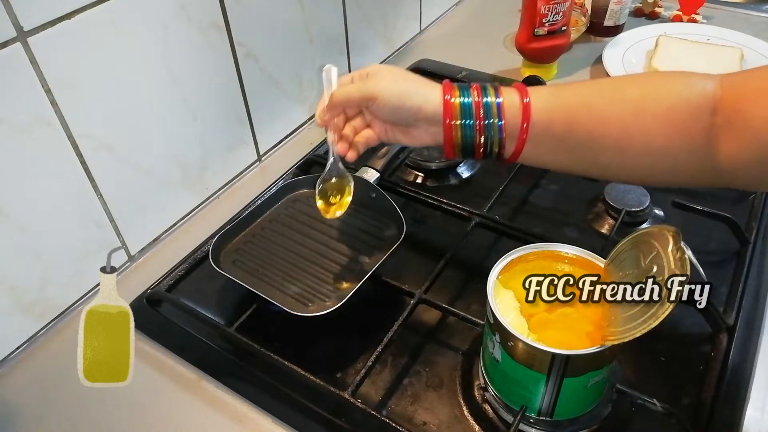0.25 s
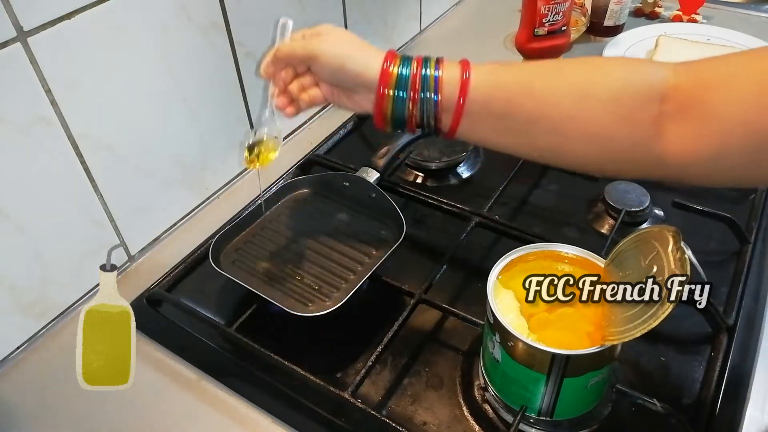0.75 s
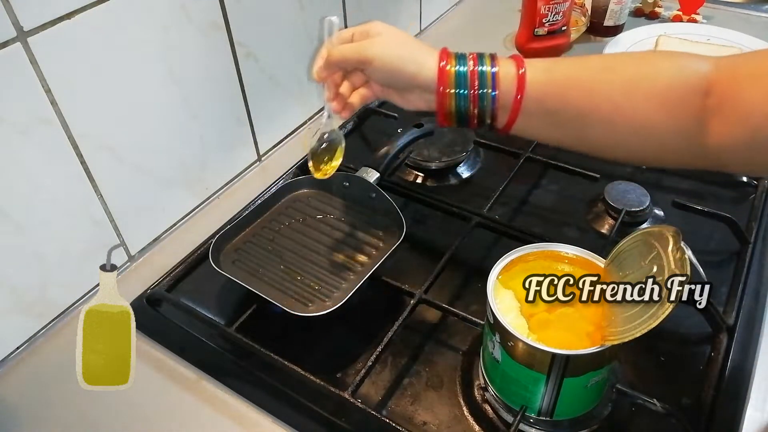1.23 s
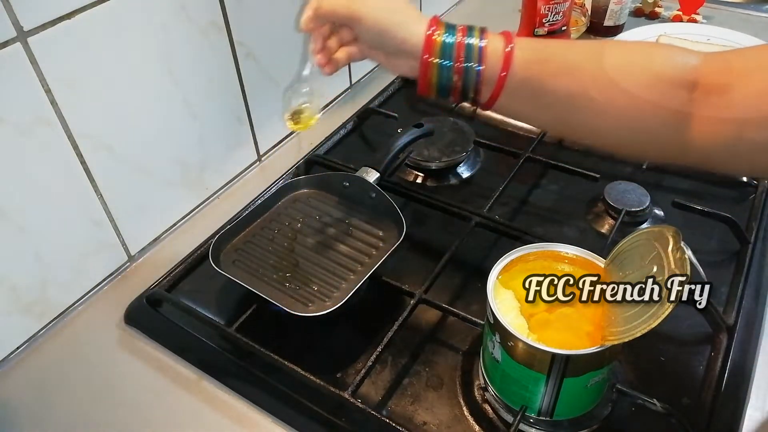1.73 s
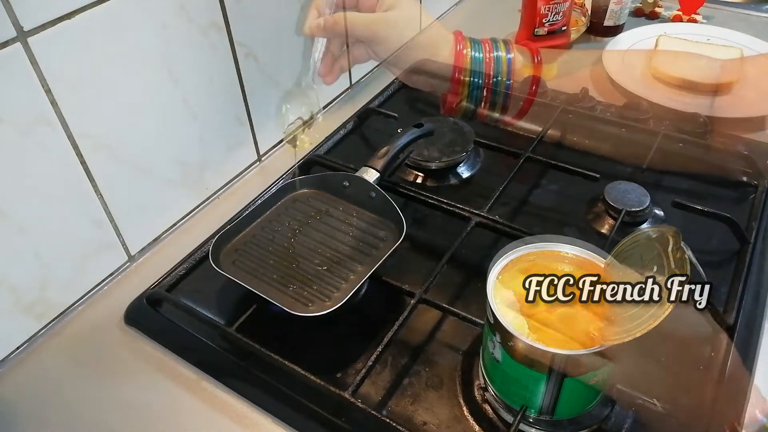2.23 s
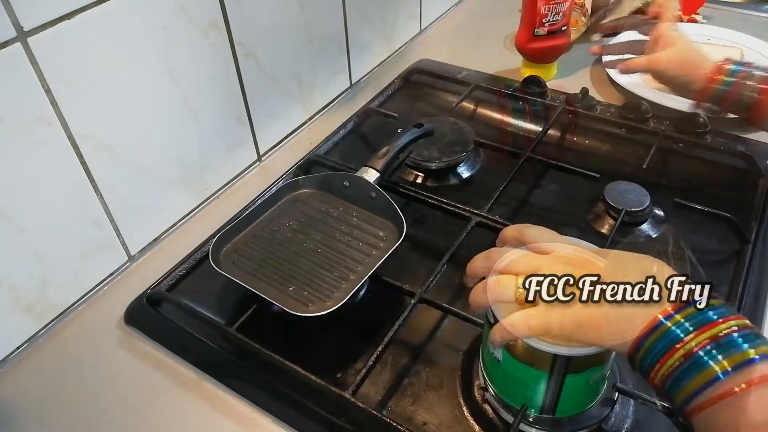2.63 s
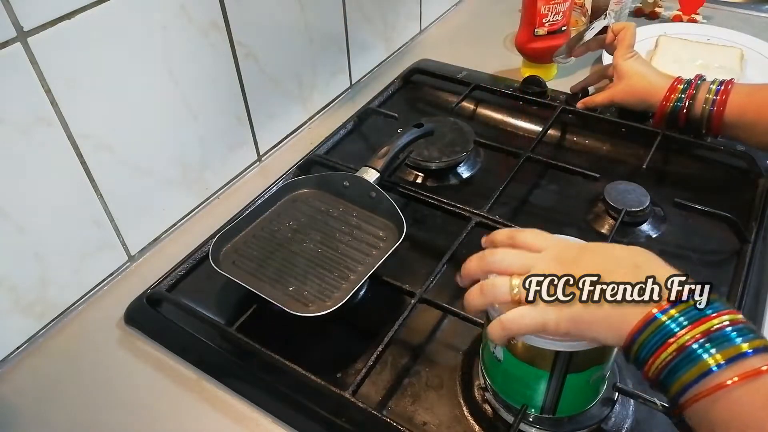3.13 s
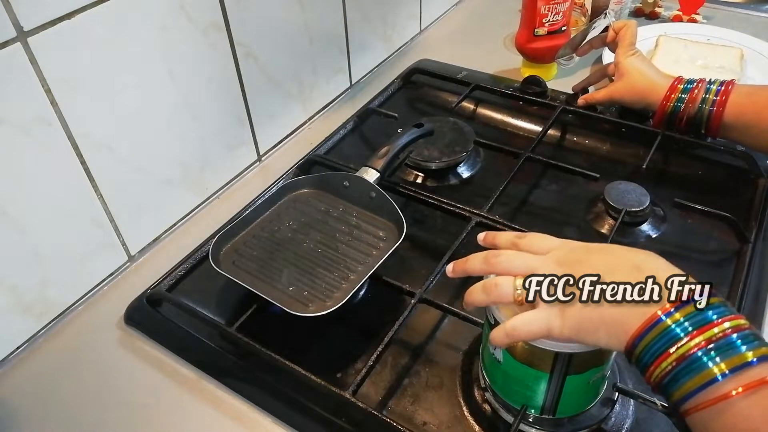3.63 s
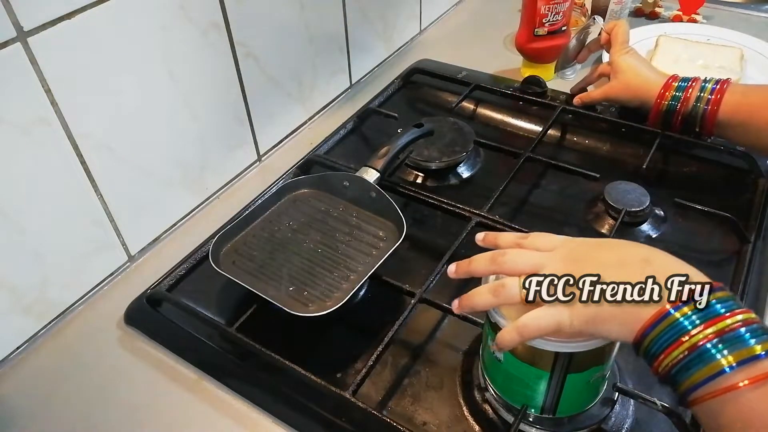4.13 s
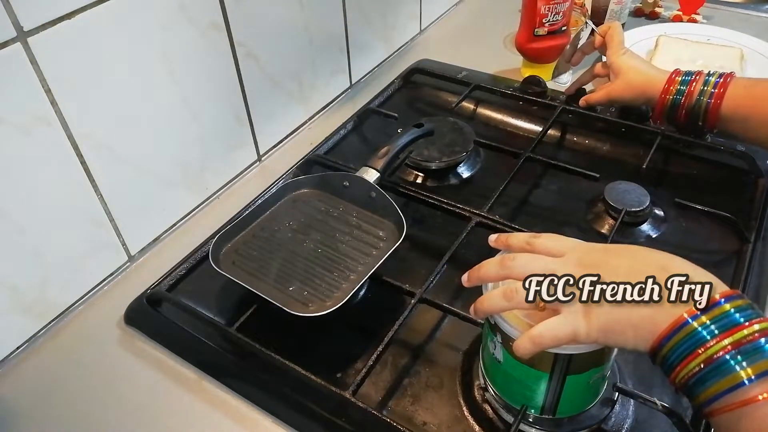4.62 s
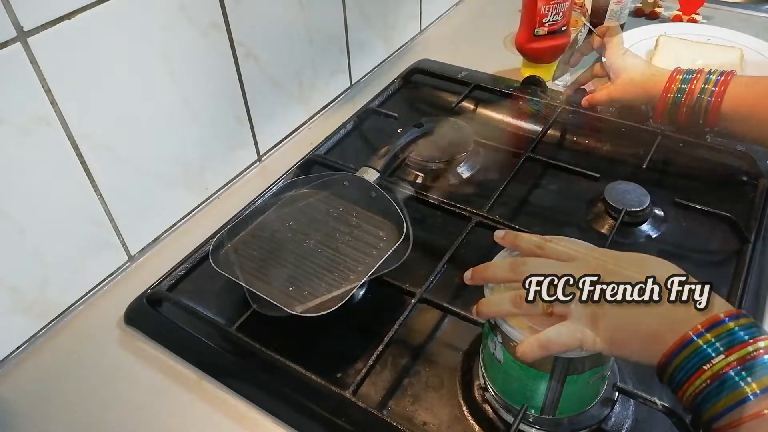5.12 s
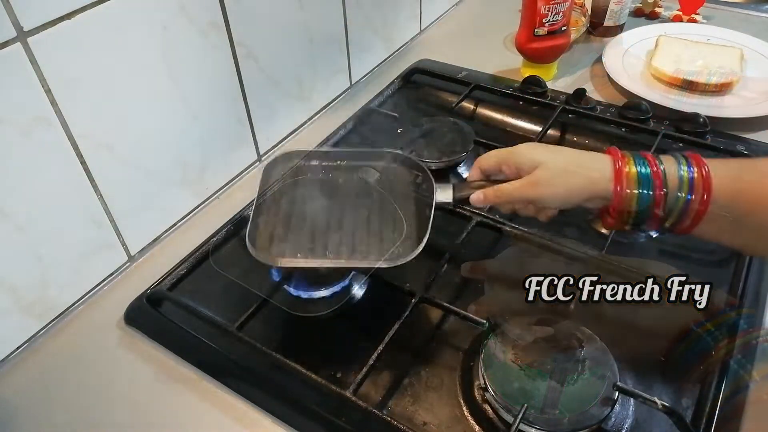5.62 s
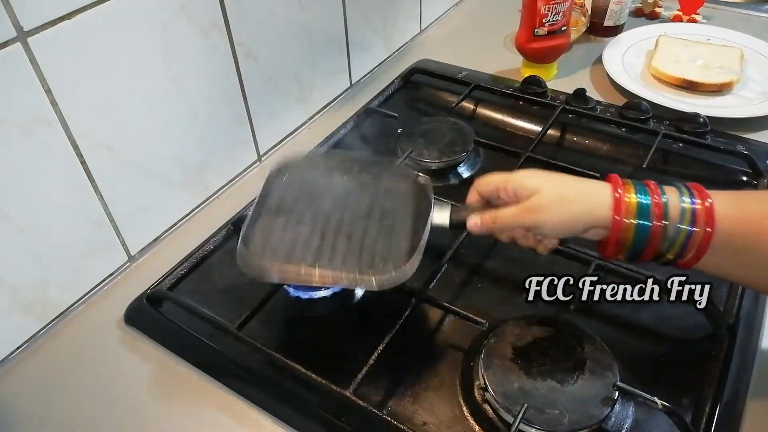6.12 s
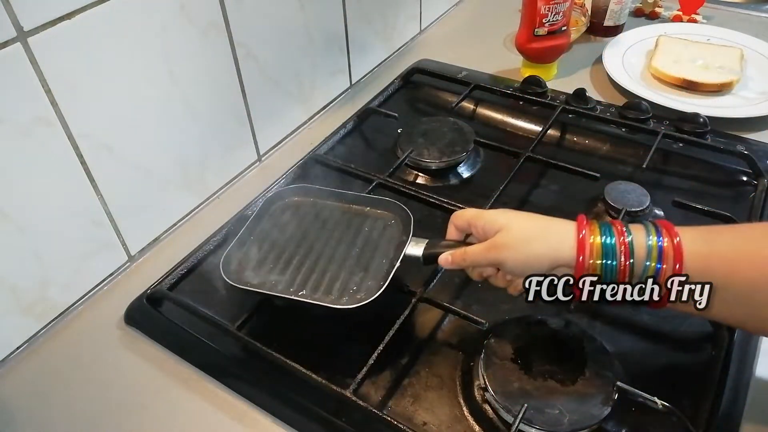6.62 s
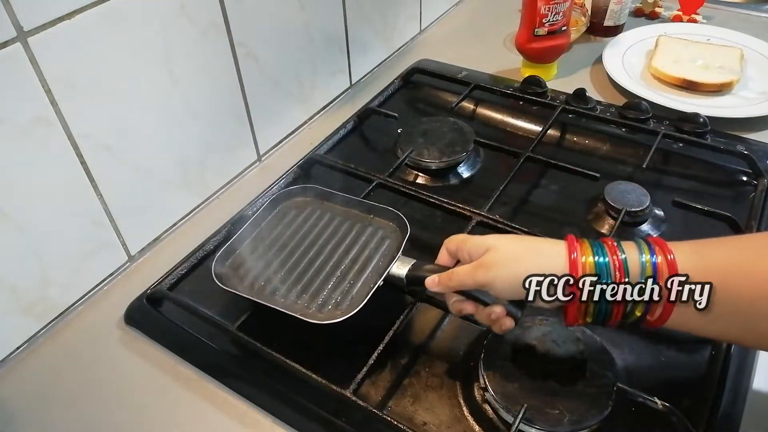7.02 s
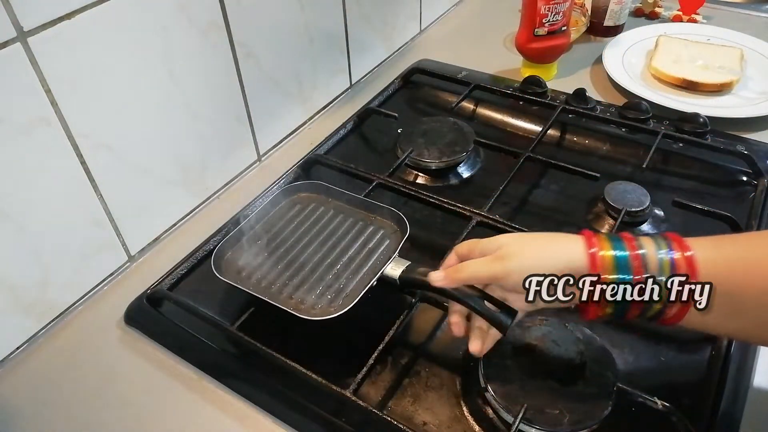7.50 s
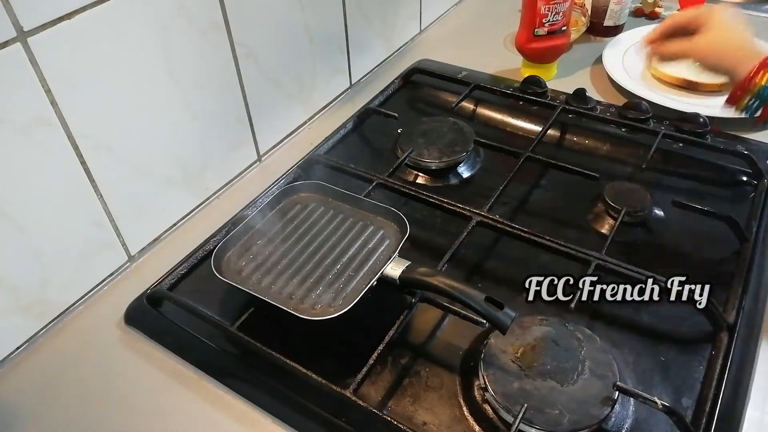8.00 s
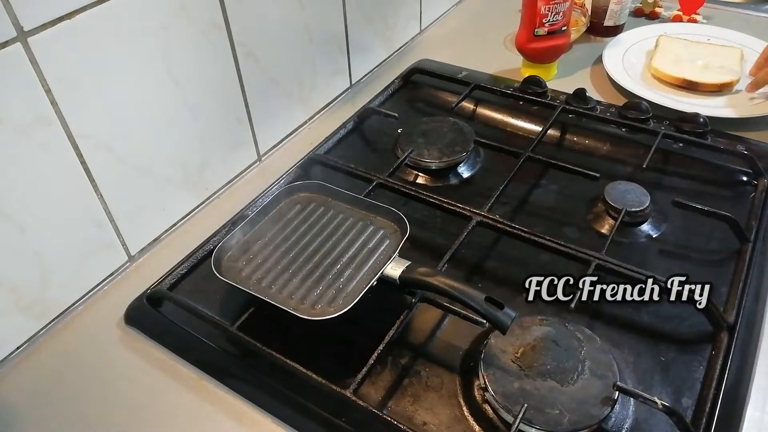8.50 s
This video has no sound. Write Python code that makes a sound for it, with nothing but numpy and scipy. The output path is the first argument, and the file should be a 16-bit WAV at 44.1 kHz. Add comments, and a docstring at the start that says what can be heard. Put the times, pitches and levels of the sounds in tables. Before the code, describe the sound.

In a tiled kitchen, bangles jingle on a moving wrist, a spoon taps lightly, a hand bumps the stove, and a pan clanks onto its grate.

```python
"""Bangles at a kitchen stove

Glass bangles clink on a moving wrist, a spoon taps, a hand bumps the stove and a palm slides over it,
and a small pan knocks on its grate. Knocks are short noise plus fading rings; the slide is tuned noise.
A refrigerator hums with low tones; room rumble and gas burner hiss are shaped noise. Tiled walls echo."""
import sys
import numpy as np
from scipy import signal
from scipy.fft import rfft, irfft
from scipy.io import wavfile
from scipy.ndimage import uniform_filter1d

SR = 44100
rng = np.random.default_rng(int(sys.argv[2]) if len(sys.argv) > 2 else 0)


def transcribe(u):
    """Save the signal u as a 16-bit wav file named by the first command-line argument.

    u: samples, shape (n,) or (channels, n), limited to [-1, 1]; the rate is SR.
    q: integer samples, one column per channel.
    """
    v = np.clip(np.atleast_2d(u).T, -1, 1)
    q = np.round(v * 32767).astype(np.int16)
    wavfile.write(sys.argv[1], SR, q)


N = 385875  # length in samples


def amp(db):
    """Turns decibels into a gain."""
    return 10 ** (np.asarray(db) / 20)


def evened(x):
    """Scales a sound to an average (rms) strength of 1."""
    return x / np.sqrt(np.mean(x ** 2) + 1e-20)


def read(points, hz):
    """Looks up a (f/Hz, value) table, with straight lines between points on a log-frequency axis."""
    f, value = np.transpose(points)
    return np.interp(np.log(hz + 1), np.log(f + 1), value)


def add(mix, s, sound):
    """Lays a two-channel sound into the mix at time s, cut off where the mix ends."""
    part = mix[:, round(s * SR):][:, :sound.shape[1]]
    part += sound[:, :part.shape[1]]


def colour(x, hz_db):
    """Makes each pitch region louder or softer, following a (f/Hz, level/dB) table."""
    size = x.shape[-1]
    gain = amp(read(hz_db, np.fft.rfftfreq(size, 1 / SR)))
    return irfft(rfft(x) * gain, size)


def rings(hz, t60, size):
    """Makes fading complex tones, one row each; a tone drops 60 dB in t60 seconds."""
    t = np.arange(size) / SR
    return np.exp(np.outer(2j * np.pi * hz - np.log(1000) / t60, t))


def edges(t, rise_s):
    """Gives a quick rise and a fade to silence at the end."""
    return np.minimum(t / rise_s, 1) * (1 - (t / t[-1]) ** 4)


def peaked(x, db, pan_db):
    """Sets the peak level and tilts the balance; pan_db is left minus right."""
    peak = np.sqrt((x ** 2).mean(0).max())
    return x / peak * amp(db + np.array([[pan_db], [-pan_db]]) / 2)


# How alike noise is in the left and right channels: (f/Hz, likeness; below 0 counts as unrelated)
LIKENESS = [(60, 1), (180, 0.72), (550, 0.7), (1650, -0.92), (4970, -0.4), (15000, 0.33)]


def likeness(hz):
    """Gives the left-right likeness from 0 (unrelated) to 1 (identical)."""
    return np.clip(read(LIKENESS, hz), 0, 1)


def pair(size):
    """Makes two-channel white noise: alike in the bass, unrelated or only partly alike higher up."""
    left, other = rfft(rng.standard_normal((2, size)))
    same = likeness(np.fft.rfftfreq(size, 1 / SR))
    return irfft([left, same * left + np.sqrt(1 - same ** 2) * other], size)


# Levels of the hum tones over time, rms before the small side tilt; the buzz dips around 2.25 s:
# (t/s, buzz level/dB, motor level/dB)
HUM_LEVELS = [(0, -54, -56.5), (1.25, -54, -58.5), (1.75, -60.5, -63.5), (2.25, -72, -60),
              (2.6, -66.5, -63), (3.1, -56.5, -61.5), (3.9, -53, -54), (4.75, -56.5, -69.5),
              (5.75, -56, -68.5), (6.75, -54, -55), (7.25, -54.5, -64), (8.75, -55, -57)]
# Fainter wavering tones: (f/Hz, width/Hz, level/dB)
FAINT_TONES = [(49.1, 1.3, -71.5), (145.6, 2.2, -74.5), (169.76, 4, -69.5), (200.5, 1, -79)]
BUZZ_HZ, MOTOR_HZ = 100, 74.6


def fridge():
    """Hums with a mains buzz and a slightly drifting motor tone, plus narrow noise bands that waver."""
    t = np.arange(N) / SR
    s, buzz_db, motor_db = np.transpose(HUM_LEVELS)
    drift = 0.2 * np.sin(2 * np.pi * (0.405 * t + rng.random()))  # turns of phase
    buzz = amp(np.interp(t, s, buzz_db)) * np.sin(2 * np.pi * BUZZ_HZ * t)
    motor = amp(np.interp(t, s, motor_db)) * np.sin(2 * np.pi * (MOTOR_HZ * t + drift))
    f, spectrum = np.fft.rfftfreq(N, 1 / SR), rfft(rng.standard_normal(N))
    faint = 0
    for hz, width, db in FAINT_TONES:
        band = irfft(spectrum / (1 + ((f - hz) / width * 2) ** 2), N)
        faint = faint + amp(db) * evened(band)
    return np.sqrt(2) * (buzz * amp([[-.7], [.7]]) + motor * amp([[-1.5], [1.5]])) + faint


# Shape of the room rumble: (f/Hz, level/dB)
RUMBLE_SHAPE = [(71, -31), (120, 7), (129, -8.5), (172, -2), (188, -10.5), (250, -4.5), (321, -12.5),
                (405, -4), (440, -14), (521, -6), (658, -20), (763, -15.5), (1500, -23), (1950, -62),
                (3300, -120)]
# Lowest part of the rumble: (f/Hz, level/dB)
DEEP_SHAPE = [(10, -18), (28, -4), (36, -8), (50, -9.5), (90, 3.5), (120, -2), (140, -62)]
# Level of the burner hiss around 10.5 kHz over time: (t/s, level/dB)
HIGH_HISS_LEVELS = [(0, -51.5), (2.53, -56.5), (2.92, -53.5), (3.0, -51), (6.04, -60), (6.63, -58),
                    (7.34, -57.5), (8.75, -57)]
# Shape of the burner hiss around 10.5 kHz, lifted by the microphone's resonance: (f/Hz, level/dB)
HIGH_HISS_SHAPE = [(8800, -52), (9500, -17.5), (10000, -2.5), (10400, -4), (10900, 2.5), (11400, -8),
                   (12300, -15), (13200, -50)]
# Shape of the broad burner hiss: (f/Hz, level/dB)
HISS_SHAPE = [(500, -26), (1000, 0.5), (2500, 1.5), (5000, -2), (8000, -1), (12000, 3), (15000, -5),
              (15700, -9.5), (15850, -29)]
# The gas jet's own resonances, as humps on the hiss: (f/Hz, width/Hz, level/dB)
JET_HUMPS = [(2174, 370, 8.5), (3670, 150, 9.5), (5810, 470, 7), (7260, 330, 7), (13500, 410, 7.5),
             (15140, 600, 17)]
RUMBLE_DB, RUMBLE_FOLLOWS = -58.5, 0.12  # level at the loudest buzz; share of the buzz's dB changes
HISS_DB, HISS_FOLLOWS = -88, 0.15  # per frequency bin at the loudest high hiss; share of its dB changes
JET_PER_DB = 0.06  # the humps shrink by this share for each dB the high hiss drops


def air(patchy_db=1.08):
    """Makes room rumble and burner hiss from random short-time spectra with drifting patches."""
    frames, hz = N // 256 + 5, np.fft.rfftfreq(1024, 1 / SR)
    t = np.arange(frames) * 256 / SR
    high_db = np.interp(t, *np.transpose(HIGH_HISS_LEVELS))
    buzz_db = np.interp(t, *np.transpose(HUM_LEVELS)[:2])
    drop_db = high_db - high_db.max()
    hiss_db = HISS_DB + HISS_FOLLOWS * drop_db
    jet = 1 + JET_PER_DB * drop_db
    rumble_db = RUMBLE_DB + RUMBLE_FOLLOWS * (buzz_db - buzz_db.max())

    low = np.hypot(amp(read(RUMBLE_SHAPE, hz)), amp(read(DEEP_SHAPE, hz)))
    rumble = np.outer(low, amp(rumble_db)) / np.linalg.norm(low)
    high = amp(read(HIGH_HISS_SHAPE, hz))
    high_hiss = np.outer(high, amp(high_db)) / np.linalg.norm(high)
    humps_db = sum(db * np.exp(-((hz - f) / width) ** 2) for f, width, db in JET_HUMPS)
    hiss = amp(read(HISS_SHAPE, hz)[:, None] + np.outer(humps_db, jet) + hiss_db)
    strength = np.sqrt(rumble ** 2 + high_hiss ** 2 + hiss ** 2)

    a, b, c, d, patches = rng.standard_normal((frames, 513, 5)).T
    # smooth over neighbouring pitches, then over time
    patches = evened(uniform_filter1d(uniform_filter1d(patches, 8, 0), 14, 1))
    same, left = likeness(hz)[:, None], a + 1j * b
    z = np.array([left, same * left + np.sqrt(1 - same ** 2) * (c + 1j * d)])
    z *= strength * amp(patchy_db * patches)
    noise = signal.istft(z, nperseg=1024, noverlap=768)[1][:, :N]
    return noise * amp([[-2.5], [-.6]])  # final trim of left and right, in dB


# Bangles knocking together: (t/s, peak level/dB, lower rings' level/dB, left minus right level/dB)
CLINK_TIMES = [(0.073, -32.5, -23, 0), (0.0778, -29.5, -25, -10), (0.132, -42, -22, -6),
               (.147, -41.5, -29, -1), (0.994, -38.5, -17, -4), (1.026, -32.5, -18.5, -5),
               (1.0394, -34.5, -23, -1), (1.06, -37, -22, -6), (1.479, -32.5, -27, -4),
               (1.515, -33.5, -25, -1), (1.53, -32.5, -24, -3), (1.554, -27, -23, -1), (1.564, -32, -24, 3),
               (1.578, -34, -27, -8), (1.67, -36.5, -19, -3), (1.726, -35, -21, -2), (1.832, -45, -26, -4),
               (2.3314, -46.5, -15, -2), (2.522, -46.5, -9, -1), (2.6795, -25.5, -20, -1),
               (2.688, -24.5, -19, -1), (2.6977, -29, -26, -2), (2.73, -24, -14, -2), (2.745, -30, -1, -4),
               (2.758, -26, -17, 2), (2.777, -33, -19, -1), (2.8455, -27.5, -22, -4),
               (3.011, -24, -24.5, -1), (4.9716, -38, -18, -15), (4.9793, -29, -15.5, -2),
               (5.252, -28.5, -22, -1), (5.275, -25.5, -23, -1), (5.338, -23.5, -25.5, 1),
               (5.385, -35, -18, 1), (5.4364, -31.5, -24, 3), (5.442, -31, -19, 0), (5.457, -28.5, -24, 2),
               (5.5994, -32, -20, -1), (5.8366, -40, -20, -2), (6.0954, -36.5, -24, -2),
               (6.127, -33.5, -17, 2), (6.139, -36, -20, -5), (6.382, -43, -29, -5), (6.428, -41.5, -24, 0),
               (7.79, -38.5, -27, -5), (7.937, -40.5, -32, -3), (8.136, -33, -21.5, -1),
               (8.1714, -27.5, -23, -3), (8.2835, -24, -25, 0), (8.304, -28, -22, -2),
               (8.319, -30, -21, -5), (8.343, -25.5, -25, -2), (8.3724, -33.5, -24, -2),
               (8.584, -36, -21, 1), (8.625, -40.5, -26, -4), (8.731, -30, -23.5, -3)]
# Rings of the bangles, before random detuning: (f/Hz, level/dB, time to fade 60 dB: t/s)
GLASS_RINGS = [(4540, -13, 0.28), (5060, -5.5, 0.082), (5500, 0, 0.1), (6100, -4.5, 0.07),
               (6880, -5.5, 0.099), (7300, -5, 0.098), (8100, 5, 0.09), (8430, 3, 0.079), (9670, -8, 0.074),
               (10010, -4, 0.1), (10390, 3, 0.068), (10790, -2, 0.028), (12200, 2, 0.076),
               (13030, 11.5, 0.062), (13700, 2, 0.077), (14400, 11.5, 0.06), (16100, -22, .08),
               (14700, 5, 0.062)]
# Noise of glass touching glass: (f/Hz, level/dB)
GLASS_TICK = [(2000, -25), (4000, -7), (8300, 2), (9300, -4), (10300, 2.5), (11400, -10.5), (12400, 8.5),
              (15500, -8), (16500, -52)]
# One extra high ring is picked from these at random for each clink: (f/Hz)
EXTRA_RINGS = [12100, 13700, 13400, 15350]
UPPER_DB, UPPER_SPREAD_DB = -16.5, 1.5  # filter level from 12 kHz up, and its random spread


def bangles(count=3, extra_db=13, tick_db=-4, fade_db=10, rattle_s=.009, detune=0.03):
    """Rattles glass on glass: each clink has a few contacts that tick and ring, with one extra high ring."""
    out = np.zeros((2, N))
    hz, db, t60 = np.transpose(GLASS_RINGS * 3)  # three sets of rings, each detuned at random
    t, tick_s, spread_db = np.arange(4608) / SR, .004, 4.5
    for s, peak_db, lower_db, pan_db in CLINK_TIMES:
        upper_db = rng.normal(UPPER_DB, UPPER_SPREAD_DB)
        extra_hz = rng.choice(EXTRA_RINGS) * rng.normal(1, .008)
        tones = np.append(hz * (1 + detune * rng.standard_normal(len(hz))), extra_hz)
        modes = rings(tones, np.append(t60, .09), size=len(t))
        struck_db = np.append(db + spread_db * rng.standard_normal(len(hz)), extra_db)
        clink = np.zeros((2, len(t)))
        for k in range(count):
            share = amp(struck_db + 2.3 * rng.standard_normal(len(tones)))
            phase = np.exp(2j * np.pi * rng.random((2, len(tones))))
            ring = ((share * phase) @ modes).real / np.linalg.norm(share)
            tick = evened(colour(rng.standard_normal((2, len(t))), GLASS_TICK)) * np.exp(-t / tick_s)
            late = rng.random() * (k > 0)  # later contacts are weaker
            add(clink, late * rattle_s, (ring + amp(tick_db) * tick) * amp(-fade_db * late))
        # the middle rings stay; those below and above are turned down
        clink = colour(clink, [(8300, lower_db), (9300, 0), (11300, 0), (12000, upper_db)])
        add(out, s, peaked(clink * edges(t, 0.0011), peak_db, pan_db))
    return out


def knock(modes, crack, treble_db, low_hz, knee_hz, ring_db, push_s, rattle_db, rattle_s):
    """Strikes a body: contact noise, treble set for each blow; loose parts rattle on and the body rings."""
    t = np.arange(8192) / SR
    hz, db, t60 = np.transpose(modes)
    force = np.exp(-t / push_s)
    noise = evened(colour(pair(len(t)), crack)) * (force + amp(rattle_db) * np.exp(-t / rattle_s))
    body = (amp(db + 2 * rng.standard_normal(len(db))) @ rings(hz, t60, size=len(t))).imag
    # the noisy push sets the body ringing
    rung = signal.fftconvolve(pair(len(t)) * force, body[None], axes=1)[:, :len(t)]
    sound = noise + amp(ring_db) * rung / abs(rung).max()
    treble = [(knee_hz, 0), (knee_hz * 2, treble_db)]
    sound = colour(sound, treble) * edges(t, 0.000076)
    # removes deep bass that the short envelope adds to the noise
    no_bass = signal.butter(3, low_hz, "high", fs=SR, output="sos")
    return signal.sosfilt(no_bass, sound)


# Spoon taps: (t/s, peak level/dB, treble level/dB)
TAP_TIMES = [(1.68, -42, -10), (1.725, -42, 11.5), (1.923, -39, -5.5), (1.938, -47, 4), (1.955, -45.5, 4),
             (2.006, -39, -3), (2.092, -47, -7), (2.169, -57, -14)]
# Rings of the spoon: (f/Hz, level/dB, time to fade 60 dB: t/s)
SPOON_RINGS = [(774, -7, 0.044), (1240, 0, 0.04), (1560, -5, 0.031), (2220, -18, .04)]
# Noise of the spoon's contact: (f/Hz, level/dB)
SPOON_CONTACT = [(240, -27), (400, -11), (970, -15), (1310, -4), (2650, -13), (3060, -11), (4280, -26),
                 (7000, -23), (9100, -61), (15400, -120)]


def spoon():
    """Taps lightly and dryly: a very short contact and rings that die fast."""
    out = np.zeros((2, N))
    for s, peak_db, treble_db in TAP_TIMES:
        tap = knock(SPOON_RINGS, SPOON_CONTACT, treble_db, low_hz=300, knee_hz=2200, ring_db=0,
                    push_s=0.0012, rattle_db=-11.5, rattle_s=0.015)
        add(out, s, peaked(tap, peak_db, -0.73))
    return out


# A hand bumping and pressing the stove: (t/s, peak level/dB, treble level/dB)
BUMP_TIMES = [(2.686, -46, 1.5), (2.736, -40, -4), (2.777, -32, 0), (2.8031, -27.5, 4.5),
              (2.817, -30.5, -28), (3.196, -52, -1), (3.22, -39.5, -2), (3.227, -31.5, 4),
              (3.238, -28.5, -6), (3.256, -48, -12), (3.304, -46, -8), (3.406, -46.5, -10),
              (3.679, -48, -7), (3.768, -49, -6), (4.088, -51.5, -3), (4.147, -39.5, -5), (4.2, -41.5, -10),
              (4.472, -53, -9), (5.049, -54, -20), (5.3, -55, -24), (5.545, -44, -1), (5.604, -46.5, -12),
              (5.912, -58, -16)]
# Rings of the steel stove body: (f/Hz, level/dB, time to fade 60 dB: t/s)
STOVE_RINGS = [(91, 9.5, 0.15), (122.4, -3.5, 0.14), (263.3, 0.5, 0.18), (354, -3.5, 0.14),
               (535, -29, 0.071), (810, 0, 0.081)]
# Noise of the hand's contact: (f/Hz, level/dB)
STOVE_CONTACT = [(60, -28), (90, 10.5), (125, 1.5), (190, -22.5), (300, 0), (480, -5.5), (780, -3),
                 (1100, -11), (3300, -14.5), (5250, -25), (9000, -20.5), (12000, -60)]


def stove():
    """Thuds: soft, longer pushes of a hand set the steel body ringing low."""
    out = np.zeros((2, N))
    for s, peak_db, treble_db in BUMP_TIMES:
        bump = knock(STOVE_RINGS, STOVE_CONTACT, treble_db, low_hz=84, knee_hz=1070, ring_db=0,
                     push_s=0.016, rattle_db=-11.5, rattle_s=0.049)
        add(out, s, peaked(bump, peak_db, -0.2))
    return out


SLIDE_S, SLIDE_LENGTH_S, SLIDE_DB = 3.59, 0.16, -60  # level before the swell
SLIDE_FROM_HZ, SLIDE_TO_HZ = 320, 760


def slide(width=170):
    """Drags a palm over steel: noise in one resonance (width in Hz) that rises through the stroke."""
    t = np.arange(round(SLIDE_LENGTH_S * SR / 2) * 2) / SR
    hz = SLIDE_FROM_HZ + (SLIDE_TO_HZ - SLIDE_FROM_HZ) * t / t[-1]
    turn, r = np.exp(2j * np.pi * np.cumsum(hz) / SR), np.exp(-np.pi * width / SR)
    # shift the moving pitch down to zero, smooth there, shift back up
    smooth = signal.lfilter([1 - r], [1, -r], pair(len(t)) / turn)
    rub = (turn * smooth).real
    swell = np.sin(np.pi * np.sqrt(t / t[-1]))
    out = np.zeros((2, N))
    add(out, SLIDE_S, evened(rub) * amp(SLIDE_DB) * swell)
    return out


# The pan touching its grate: (t/s, peak level/dB, treble level/dB)
PAN_TIMES = [(5.038, -45.5, -34), (5.378, -43, -8.5), (5.541, -40, -15.5), (5.602, -39.5, 4),
             (6.578, -19.5, -7.5), (6.593, -34, -22), (6.723, -40.5, -52), (6.7522, -17, -3),
             (6.759, -10.5, 0), (6.781, -30.5, -14.5)]
# Rings of the pan: (f/Hz, level/dB, time to fade 60 dB: t/s)
PAN_RINGS = [(222, -9.5, 0.35), (267, -1.5, 0.22), (318, -3.5, 0.11), (409, -2.5, 0.082),
             (537, -10.5, 0.12), (703, -5.5, 0.14), (1223, -4, 0.13), (1300, -6.5, 0.11),
             (1440, -20, 0.038), (2150, 5.5, 0.086), (3170, -22, 0.06), (6200, -3, .1), (7500, -8, .08),
             (8100, -10, 0.084)]
# Noise of the pan's contact: (f/Hz, level/dB)
PAN_CONTACT = [(130, -37), (230, -8), (725, -15.5), (985, -18), (1270, -13.5), (1760, -14), (2140, -7.5),
               (2300, -12.5), (3370, -12.5), (6110, -13.5), (9950, -4.5), (15100, -29), (16500, -51)]


def pan():
    """Knocks coated metal on an iron grate: a sharp crack, a rattle and short rings."""
    out = np.zeros((2, N))
    for s, peak_db, treble_db in PAN_TIMES:
        hit = knock(PAN_RINGS, PAN_CONTACT, treble_db, low_hz=210, knee_hz=1720, ring_db=-6.5,
                    push_s=0.0035, rattle_db=-9, rattle_s=0.016)
        add(out, s, peaked(hit, peak_db, -1.5))
    return out


# How long the kitchen's echo lasts: (f/Hz, time to fade 60 dB: t/s)
ECHO_TIMES = [(100, 0.59), (300, 0.46), (1000, 0.41), (4000, 0.42), (10000, 0.33), (16000, 0.2)]


def kitchen(x):
    """Echoes off tiled walls: sparse reflections of random sign, each band dying at its own speed."""
    taps = np.zeros((2, SR // 2))
    slots = np.arange(200, SR // 2 - 20, 20)
    at = slots + rng.integers(0, 20, (2, len(slots)))
    np.put_along_axis(taps, at, rng.choice([-1., 1.], at.shape), 1)
    hz, t, z = signal.stft(taps, SR, nperseg=256)
    same = likeness(hz)[:, None]
    z[1] = same * z[0] + np.sqrt(1 - same ** 2) * z[1]
    fade = amp(-60 * t / read(ECHO_TIMES, hz)[:, None])
    tail = signal.istft(z * fade, SR, nperseg=256)[1]
    tail = tail / np.linalg.norm(tail[0])
    return signal.fftconvolve(x.mean(0)[None], tail, axes=1)[:, :N]


def scene():
    """Mixes the sources; all the touching sounds also feed the echo, the glass at a higher gain."""
    background = fridge() + air()
    glass = bangles()
    knocks = spoon() + stove() + slide() + pan()
    echo = kitchen(amp(-2) * glass + amp(-4.5) * knocks)
    return background + glass + knocks + echo


def record(dry):
    """Applies the recorder's band limit: a steep low-pass filter at 16.6 kHz."""
    low_pass = signal.firwin(511, 16600, window=("kaiser", 9), fs=SR)
    return signal.oaconvolve(dry, low_pass[None], "same")


dry = scene()
out = record(dry)
transcribe(out)
```